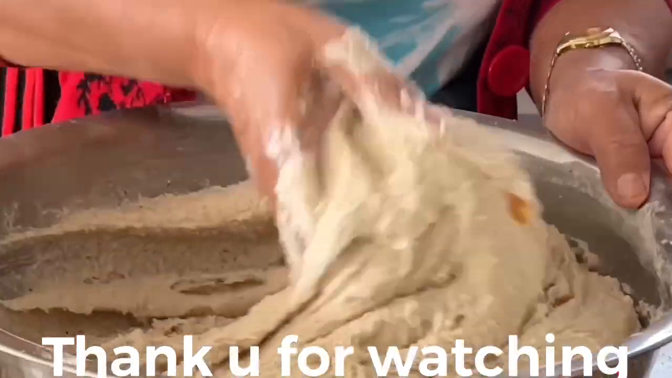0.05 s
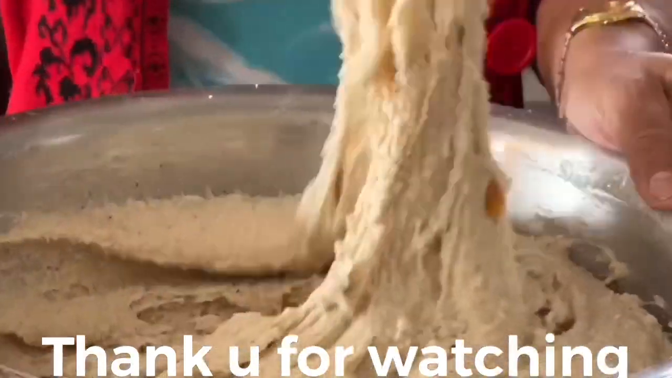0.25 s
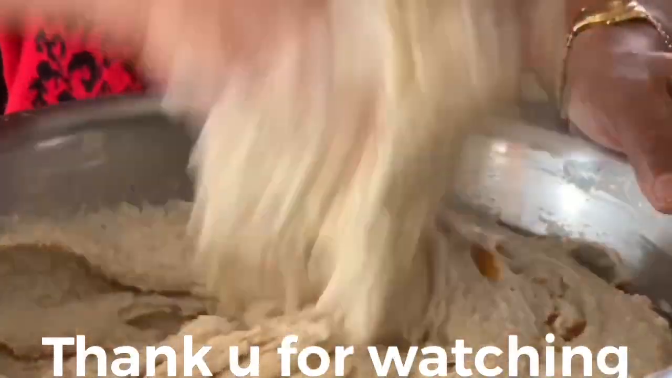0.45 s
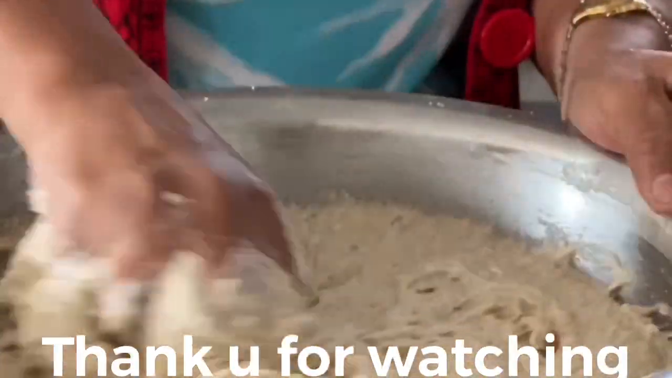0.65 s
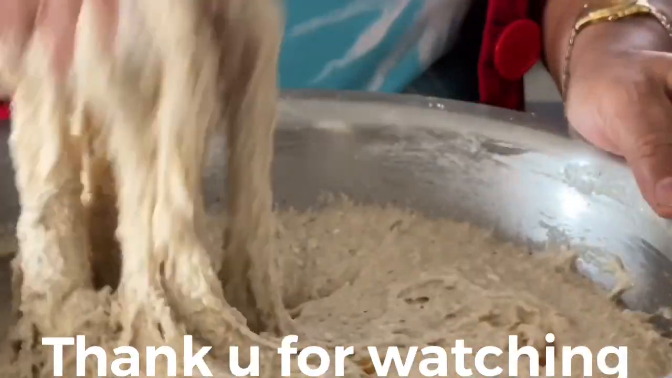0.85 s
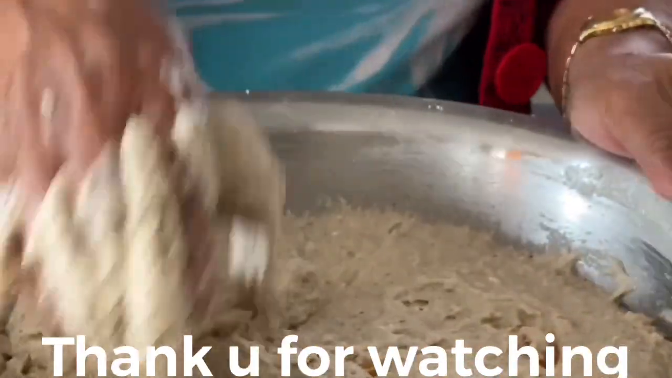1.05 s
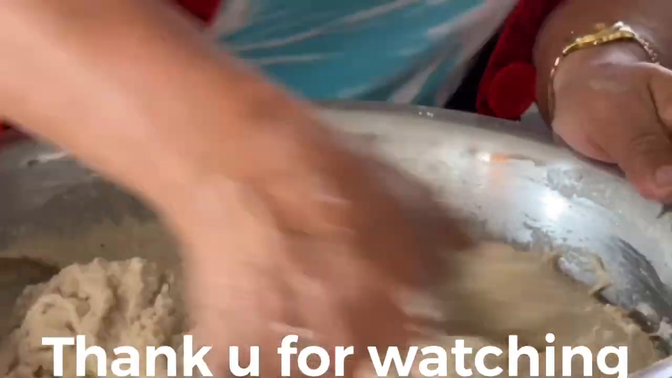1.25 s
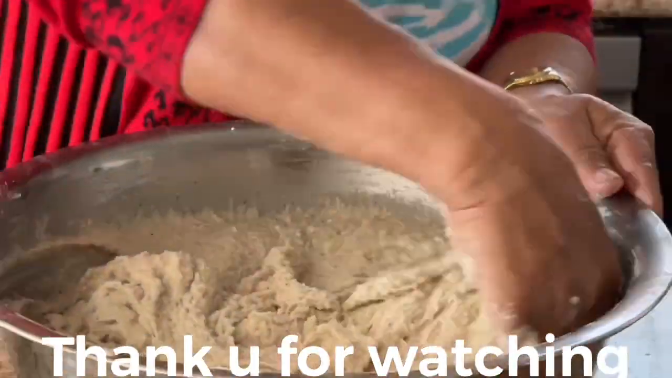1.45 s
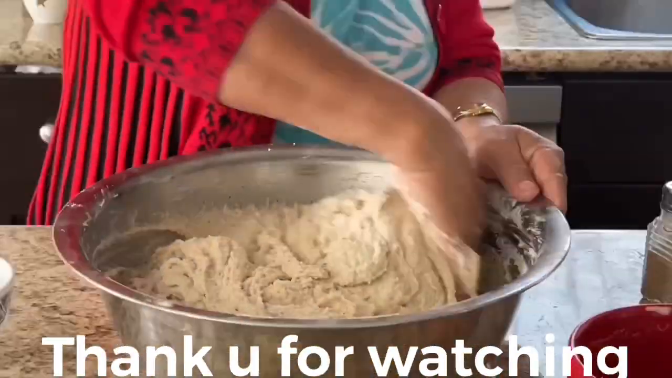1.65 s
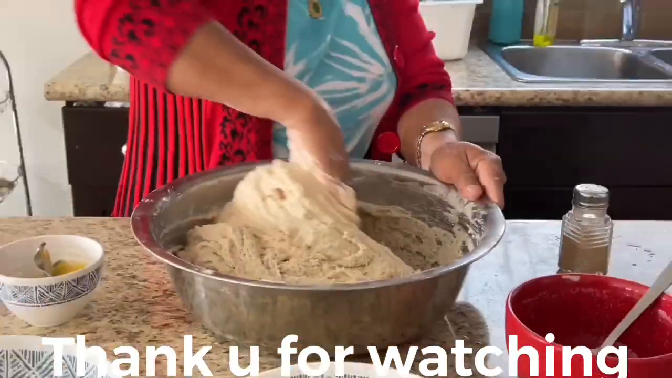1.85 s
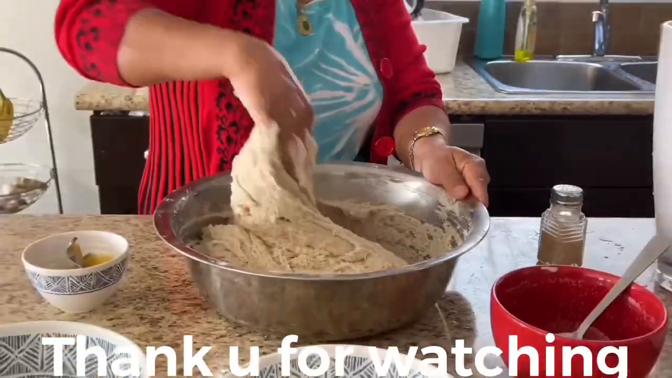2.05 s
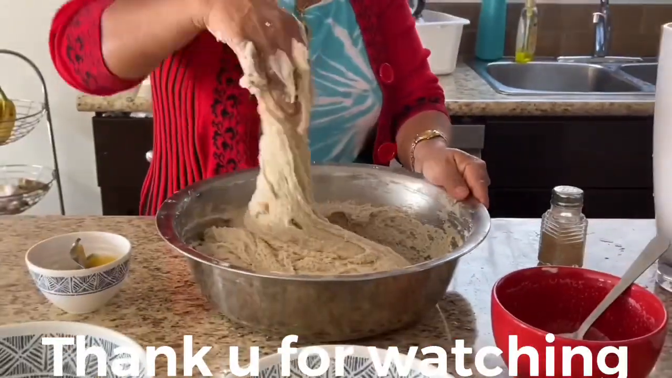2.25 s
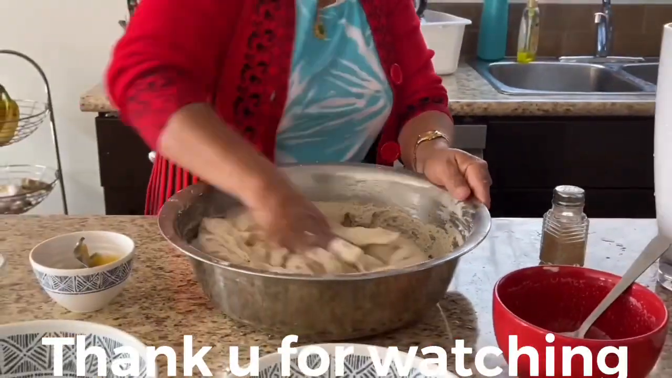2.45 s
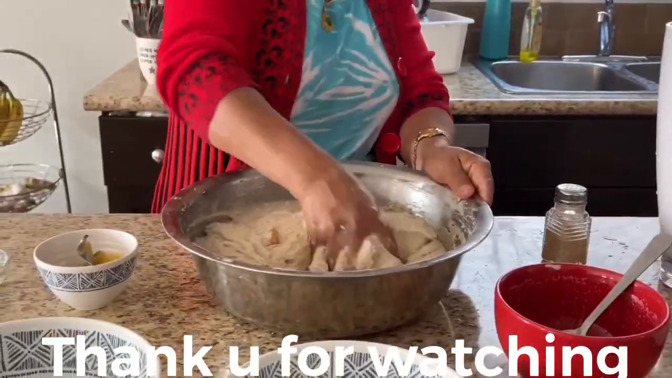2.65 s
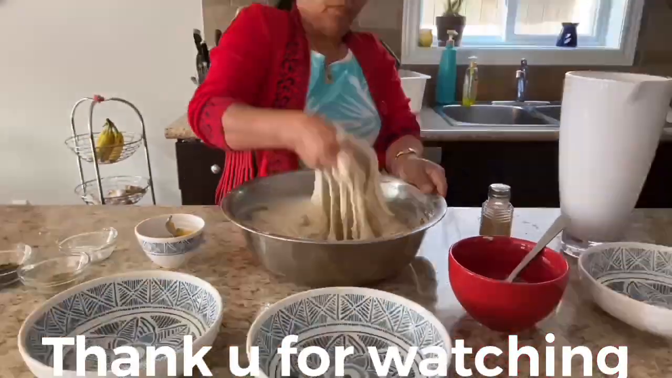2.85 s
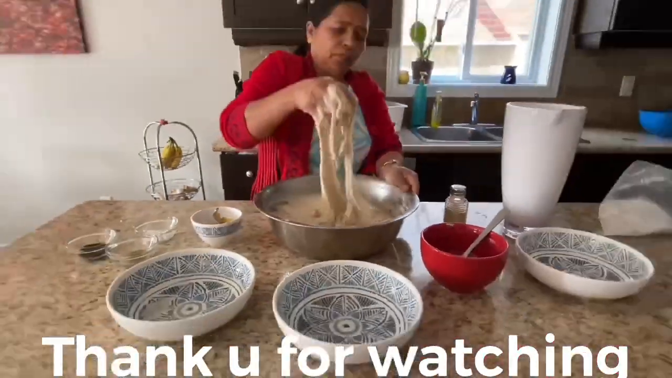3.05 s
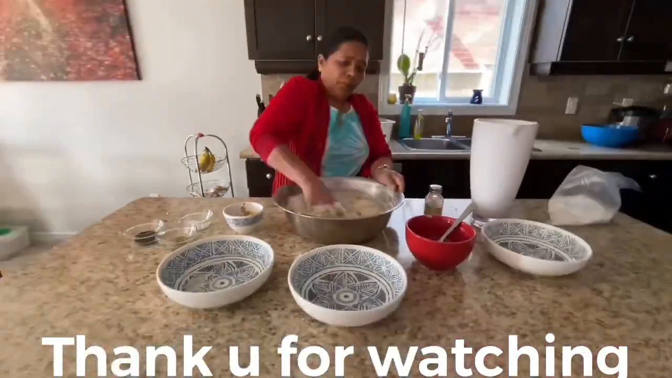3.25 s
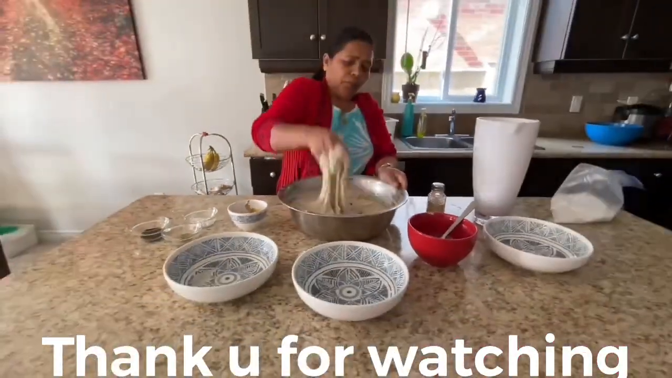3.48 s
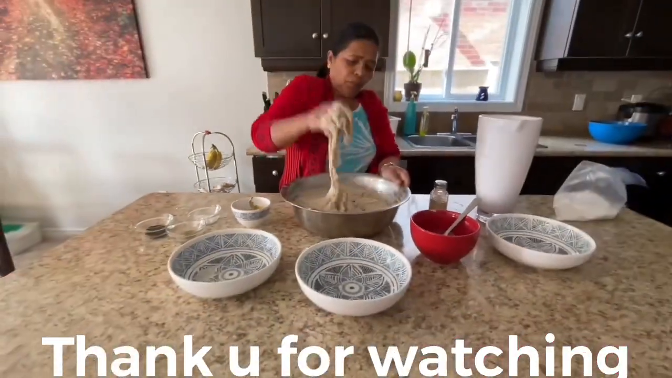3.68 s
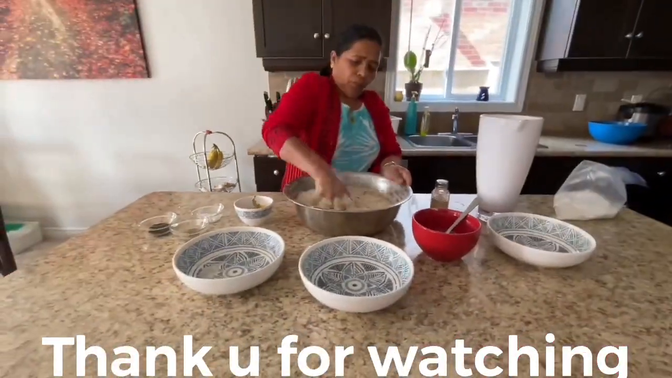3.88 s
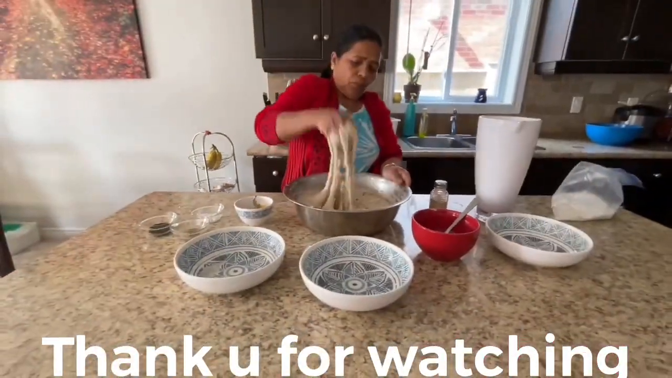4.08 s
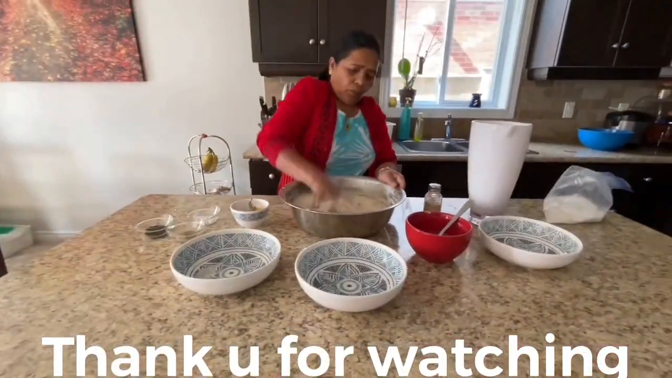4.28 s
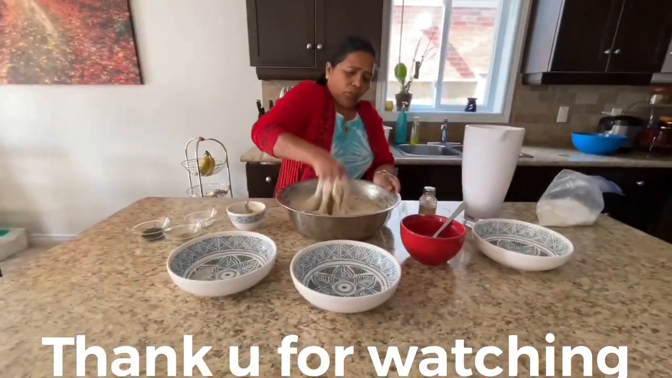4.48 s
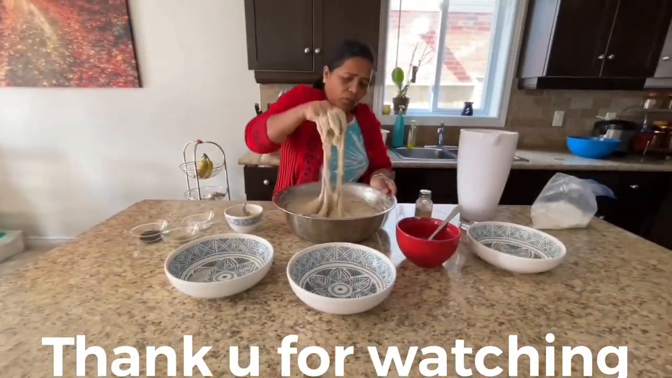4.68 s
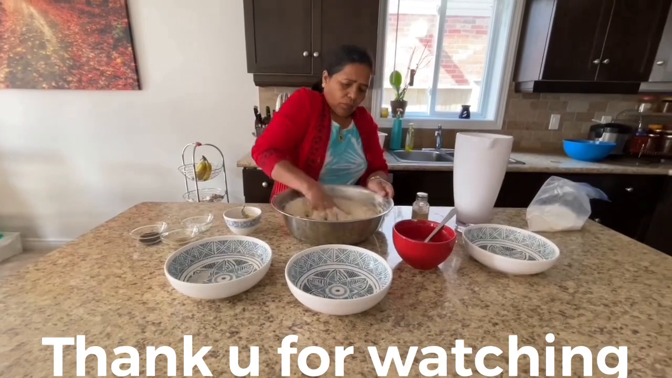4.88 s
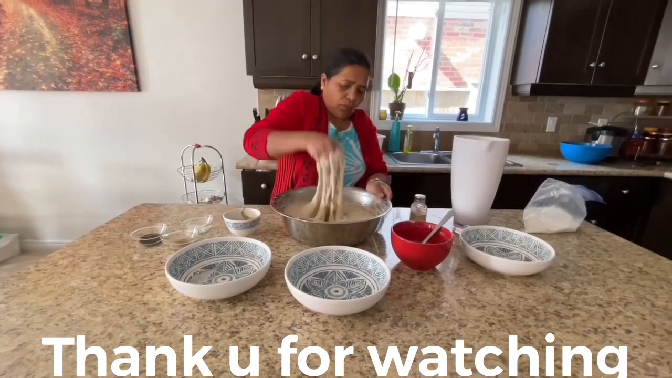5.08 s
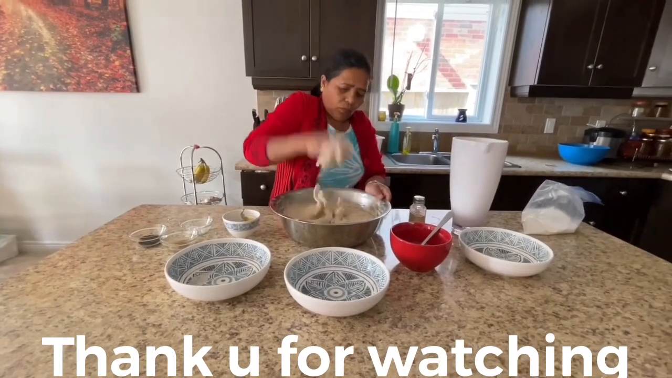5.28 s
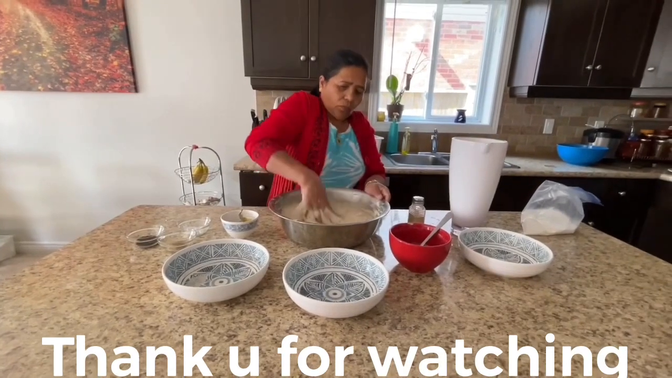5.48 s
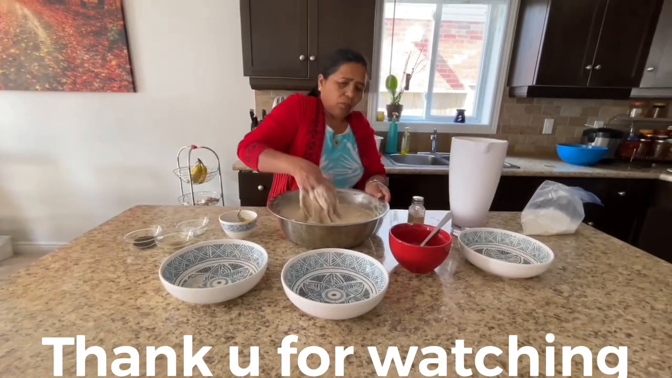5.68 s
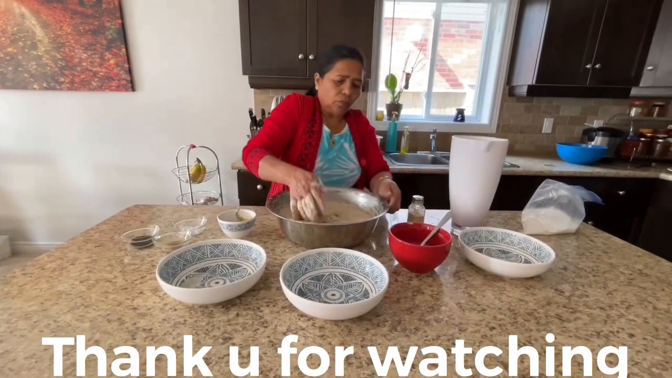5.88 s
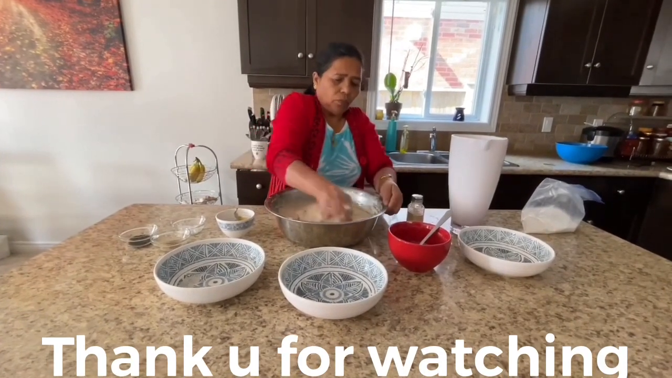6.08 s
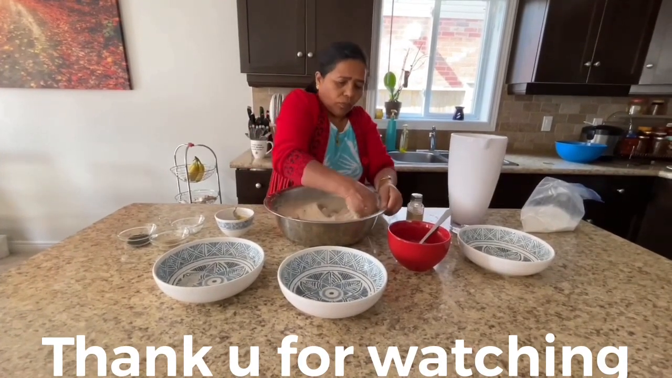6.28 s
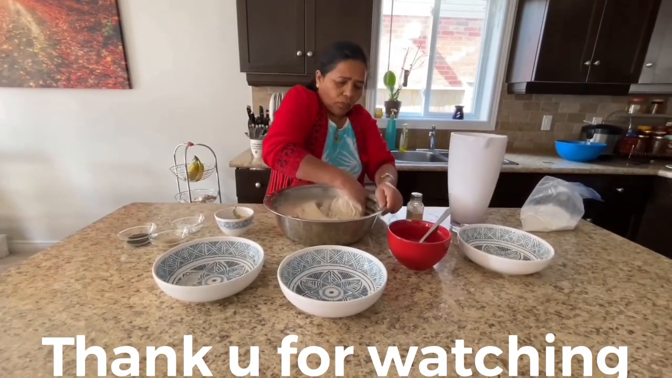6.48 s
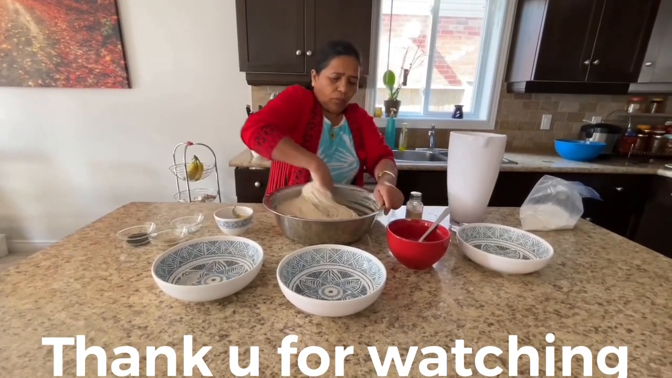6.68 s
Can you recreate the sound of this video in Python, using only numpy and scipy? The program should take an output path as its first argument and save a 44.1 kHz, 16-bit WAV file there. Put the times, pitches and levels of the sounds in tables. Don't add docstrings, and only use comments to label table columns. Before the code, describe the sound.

In a home kitchen, wet dough is worked by hand in a steel bowl. A faint drop and quiet stretching, sticky ticks and skin rubbing steel come first; then a light throw, and five heavy slaps about half a second apart, each with wet cracks, popping air and a deep thump. Rubbing closes it. A phone microphone starts close and shifts farther off midway, its noise suppression opening and closing the hiss over appliance rumble.

```python
import sys
import numpy as np
from scipy import signal
from scipy.fft import rfft, irfft
from scipy.io import wavfile
from scipy.ndimage import uniform_filter1d

SR = 44100
rng = np.random.default_rng(int(sys.argv[2]) if len(sys.argv) > 2 else 0)


def wav_out(sig):
    wavfile.write(sys.argv[1], SR, np.round(np.clip(np.atleast_2d(sig).T, -1, 1) * 32767).astype(np.int16))


def attenuation_scalar(level_db):
    decades = np.asarray(level_db, float) / 20
    return 10 ** decades


N = 296793
STEP_BACK_S = 3


def evened(x):
    return x / np.sqrt(np.mean(x ** 2) + 1e-20)


def read(points, hz):
    f, value = np.transpose(points)
    return np.interp(np.log(hz + 1), np.log(f + 1), value)


def add(mix, s, sound):
    part = mix[round(s * SR):][:len(sound)]
    part += sound[:len(part)]


def colour(x, gain_db):
    hz = np.fft.rfftfreq(x.shape[-1], 1 / SR)
    return irfft(rfft(x) * attenuation_scalar(gain_db(hz)), x.shape[-1])


# [t/s, level/dB, length/s, brightest f/Hz]
WET_CONTACTS = [(0.4018, -50, 0.0021, 2500), (0.4078, -39, .003, 4460), (0.4104, -30, 0.0063, 12000),
                (2.319, -41.5, 0.0074, 3080), (2.3356, -32.5, 0.0045, 2300), (2.341, -33.5, 0.0058, 8600),
                (2.3423, -20, 0.0017, 4630), (3.125, -43, .007, 5000), (3.13, -22.5, 0.0072, 6250),
                (3.138, -14.5, 0.0035, 3160), (3.1402, -12, 0.0027, 8240), (3.143, -20, 0.0044, 12000),
                (3.149, -16, 0.0016, 7320), (3.707, -30.5, .008, 4140), (3.713, -22, 0.0029, 6660),
                (3.718, -13, 0.0034, 8910), (4.243, -50, 0.0083, 5000), (4.2592, -29, 0.0046, 6000),
                (4.2613, -9.5, 0.0037, 6140), (4.2661, -6.5, .003, 2376), (4.267, -11.5, 0.006, 3905),
                (4.791, -33.5, 0.014, 6000), (4.8006, -8.5, 0.0078, 3927), (4.8106, -7.5, 0.001, 5600),
                (5.299, -28, 0.0064, 4203), (5.306, -9.5, 0.0028, 3040), (5.308, -12.5, 0.0048, 11940),
                (5.3096, -11, 0.0054, 6130)]
# [t/s, level/dB, length/s, brightest f/Hz]
FINGER_PEELS = [
    (0.937, -67.5, 0.0156, 3900),
    (1.007, -65, 0.0018, 6250),
    (5.749, -60, 0.013, 4050),
]
# [f/Hz, level/dB per Hz]
SMACK_COLOUR = [(300, -26), (800, 4.5), (1500, -2.5), (2200, -4), (4000, -4), (6000, -8.5), (8500, -11),
                (10500, -12), (12000, -5), (13300, -15), (15000, -20)]


def cracks(bright_db):
    out, t = np.zeros(N), np.arange(1024) / SR
    for s, db, length, bright_hz in WET_CONTACTS + FINGER_PEELS:
        uneven = attenuation_scalar(3.5 * rng.standard_normal(1024))
        snaps = rng.standard_normal(1024) * uneven
        spot = lambda hz: np.exp(-(np.log2((hz + 1) / bright_hz) / .14) ** 2)
        snaps = colour(snaps, lambda hz: read(SMACK_COLOUR, hz) + bright_db * spot(hz))
        swell = 1 - np.exp(-(t / (0.67 * length)) ** 2)
        die = np.exp(-(t / length) ** 2)
        add(out, s - .2 * length, attenuation_scalar(db + 3.5) * evened(snaps) * swell * die)
    return out


# [t/s of the middle, peak level/dB, f/Hz, length/cycles]
AIR_POCKETS = [(.4120, -38, 1570, 8.5), (0.4135, -23, 910, 0.5), (.4145, -22.5, 507, 1.4),
               (.4185, -38.5, 890, 5.6), (2.3220, -32, 605, 0.73), (2.338, -26, 714, 1.3),
               (2.3480, -23.5, 710, 1.8), (2.348, -29, 332, 3.7), (3.1405, -15.5, 860, 1.3),
               (3.1450, -4, 730, 0.84), (3.1470, -15.5, 1400, 2.7), (3.1485, -16.5, 383, 4.1),
               (3.7200, -9.5, 850, 0.88), (3.7230, -4.5, 400, 1.05), (3.7255, -11, 825, 2.9),
               (4.2670, -18, 1500, 2.5), (4.2665, -14, 2148, 5), (4.2728, -1.5, 361, 1.1),
               (4.2735, -6, 883, 1.9), (4.2780, -16, 743, 2), (4.8085, -8, 648, 1.1),
               (4.8100, -17.5, 1070, 2.1), (4.8113, -5, 389, 1.1), (4.8135, -9.5, 770, 1.5),
               (4.8165, -16, 977, 1.6), (5.3089, -14.5, 1707, 2.5), (5.3148, -10, 412, 2.6),
               (5.3172, -2.5, 432, 0.67), (5.3210, -9, 797, 2.5)]
# [t/s of the middle, peak level/dB, f/Hz, length/cycles]
DOUGH_BUBBLES = [
    (.5655, -45.5, 850, 0.75),
    (1.1560, -57, 2020, 2.5),
    (1.1850, -56, 4800, 5.5),
]


def pops():
    out, t = np.zeros(N), np.arange(-441, 442) / SR
    for s, db, hz, cycles in AIR_POCKETS + DOUGH_BUBBLES:
        soft_edges = np.exp(-(2 * t * hz / cycles) ** 2)
        add(out, s + t[0], -attenuation_scalar(db) * np.cos(2 * np.pi * hz * t) * soft_edges)
    return out


def ring(modes, t):
    total = 0
    for hz, db, t60, way, lean_db in modes:
        swing = np.sign(way) * attenuation_scalar(db - 60 * t / t60) * np.sin(2 * np.pi * hz * t)
        total = total + swing * attenuation_scalar([[lean_db / 2], [-lean_db / 2]])
    return total


# [t/s, level/dB, extra level of the upper modes/dB]
THROWS = [
    (0.4251, -32, -4),
    (2.3545, -19.5, -8.5),
    (3.154, -14, -1),
    (3.73, -11.5, -1.5),
    (4.2784, -13, -2),
    (4.8168, -15.5, 2.5),
    (5.3227, -12.5, 3),
]
# [f/Hz, level/dB, t60/s, first swing/sign, left-right level/dB]
LOW_WAVES = [(51.6, -17, 0.3, 1, -6), (61, -9.5, 0.66, -1, 2), (79.8, -2, 0.34, 1, -0.6),
             (79, -15.5, 0.05, 1, 0), (94.9, -13, 0.38, -1, -9.5)]
# [f/Hz, level/dB, t60/s, first swing/sign, left-right level/dB]
UPPER_WAVES = [(121.6, -9, 0.31, -1, 2), (161.6, -11.5, 0.17, 1, 5.5), (199, -5.5, 0.15, 1, 1.5),
               (254.5, -14, 0.36, -1, -4.5)]


def thumps():
    low, upper, t = np.zeros(N), np.zeros(N), np.arange(SR) / SR
    for s, db, upper_db in THROWS:
        add(low, s, attenuation_scalar([db]))
        add(upper, s - .004, attenuation_scalar([db + upper_db]))
    heard = lambda blows, modes: signal.fftconvolve(blows[None], ring(modes, t), axes=1)[:, :N]
    return uniform_filter1d(heard(low, LOW_WAVES) + heard(upper, UPPER_WAVES), size=100)


# [t/s, peak level/dB, f/Hz]
STRAND_TEARS = [
    (1.43, -54, 1780),
    (1.499, -48, 1000),
    (2.048, -48, 2830),
    (2.686, -53, 2690),
]


def ticks():
    out, t = np.zeros(N), np.arange(600) / SR
    for s, db, hz in STRAND_TEARS:
        rising = np.sin(2 * np.pi * hz * t * (1 + 12 * t))
        add(out, s, attenuation_scalar(db - 60 * t / .013) * rising * (1 - np.exp(-t / .0007)))
    return out


# [f/Hz, lead/rad]
PORT_LEAD = [(0, 0.5), (1460, 0.8), (3790, 2.3), (4650, 1.6), (5430, 3.5), (5940, 5.5), (6720, 9),
             (7240, 5.5), (8530, 10.5), (9470, 5), (10400, 4), (11300, -3), (12100, -1.76), (13200, -2)]


def ports(x):
    hz = np.fft.rfftfreq(N, 1 / SR)
    f, lead = np.transpose(PORT_LEAD)
    tilt_db = read([(400, -4.5), (1200, -2.5), (2500, 2.5), (8000, 2.4)], hz)
    right = irfft(rfft(x) * attenuation_scalar(tilt_db) * np.exp(-1j * np.interp(hz, f, lead)), N)
    return np.array([x, np.where(np.arange(N) > STEP_BACK_S * SR, right, x)])


# [f/Hz, correlation]
LIKENESS = [(60, .9), (180, 0.93), (520, .3), (1500, 0.086), (4300, 0.59), (5500, -0.045), (6300, -0.049),
            (8000, -0.052), (10500, -0.42), (11500, -0.59)]


def other_port(left, fresh, hz, limit):
    same = np.clip(read(LIKENESS, hz), -limit, limit)
    return same * left + np.sqrt(1 - same ** 2) * fresh


# [f/Hz, t60/s]
KITCHEN_DECAY = [(150, 0.11), (400, 0.4), (1040, 0.37), (2760, 0.37), (7280, 0.31)]
# [f/Hz, level/dB]
ECHO_TONE = [(100, -29.5), (200, 2), (380, -4), (560, -7), (850, -2), (1500, -1.5), (4000, -6), (8000, 3),
             (13000, -3.5)]


def tail():
    taps = np.zeros((2, SR // 2))
    at = np.arange(120, SR // 2 - 20, 10) + rng.integers(0, 10, (2, (SR // 2 - 131) // 10))
    np.put_along_axis(taps, at, rng.choice([-1., 1.], at.shape), 1)
    hz, t, z = signal.stft(taps, SR, nperseg=256)
    hz = hz[:, None]
    z[1] = other_port(z[0], z[1], hz, limit=.95)
    z = z * attenuation_scalar(read(ECHO_TONE, hz) - 60 * t / read(KITCHEN_DECAY, hz))
    lumps = uniform_filter1d(uniform_filter1d(rng.standard_normal(z.shape[1:]), size=4, axis=0), size=5)
    z = z * attenuation_scalar(2.5 * evened(lumps))
    echo = signal.istft(z, SR, nperseg=256)[1]
    return echo / np.linalg.norm(echo, axis=1)[:, None]


def echoes(x):
    return signal.fftconvolve(x[None], tail(), axes=1)[:, :N]


def scattered(x, turns):
    turn = 2 * np.pi * turns * np.arange(N) / SR
    return sum(echoes(x * np.sqrt(2 / 3) * np.cos(turn + k * np.pi / 3)) for k in range(3))


def noise_field(shape_db, patchy_db):
    frames, hz = N // 256 + 5, np.fft.rfftfreq(1024, 1 / SR)[:, None]
    a, b, c, d, patches = rng.standard_normal((frames, 513, 5)).T
    patches = evened(uniform_filter1d(uniform_filter1d(patches, 8, 0), 18, 1))
    left = a + 1j * b
    z = np.array([left, other_port(left, c + 1j * d, hz, limit=1)])
    unit = np.sqrt(np.mean(signal.istft(z[0], nperseg=1024, noverlap=768)[1] ** 2) / (SR / 2))
    z = z * attenuation_scalar(shape_db(hz, np.arange(frames) * 256 / SR) + patchy_db * patches) / unit
    return signal.istft(z, nperseg=1024, noverlap=768)[1][:, :N]


STROKE_RISE_S, RELEASE_DB_PER_S, PIVOT_HZ = 0.023, -260, 4000
FIRST_SHUT_HZ, LINGER_S = 6500, 0.015


def opening(hz, t, start, length, db, fade_db, tilt_db):
    u = t - start
    late = np.maximum(u - length - LINGER_S * np.log2((hz + 1) / FIRST_SHUT_HZ) ** 2, 0)
    level_db = db + fade_db * np.clip(u / length, 0, 1) + RELEASE_DB_PER_S * late
    level_db = level_db + tilt_db * np.log2((hz + 1) / PIVOT_HZ)
    return ((1 + np.tanh(u / STROKE_RISE_S)) / 2 * attenuation_scalar(level_db)) ** 2


# [t/s, length/s, level/dB per Hz, fade/dB a stroke, brightness/dB per octave]
HAND_STROKES = [(-0.05, 0.21, -108, -0.5, 1), (0.548, .22, -107, -2, 2), (0.935, 0.056, -114, -8, 5),
                (1.158, 0.28, -99, -5, -3), (1.406, 0.38, -102, -2.5, -2), (1.464, 0.642, -102, -10, 2),
                (2.59, 0.28, -109, 1, 2), (3.354, 0.11, -105, -15, 6.5), (3.897, 0.075, -108, 1, 5),
                (5.618, 0.083, -112, -4, 5.5), (5.73, 0.019, -106, -8, -1.5), (5.805, 0.042, -102, -7, -3),
                (5.797, 0.45, -110, 0, -1.5), (5.97, 0.058, -101, -12, -4.5),
                (6.083, 0.36, -100, -4.5, -1.5), (6.307, 0.94, -104, 0, -0.5), (6.625, 0.29, -106, 1, 5)]


def stretching(hz, t):
    return sum(opening(hz, t, *row) for row in HAND_STROKES)


# [t/s, length/s, level/dB per Hz, centre f/Hz, width/octaves]
WALL_RUBS = [(.7, 0.034, -104, 2200, .2), (.935, 0.019, -101, 4000, .2), (1.158, .08, -94.5, 5000, .3),
             (1.202, 0.26, -101, 2460, .4), (1.462, .08, -92.5, 1050, 0.23),
             (1.597, 0.27, -101, 3200, 0.46), (2.613, 0.13, -102, 2500, 0.64),
             (5.797, 0.33, -100, 4250, 0.11), (5.82, 0.43, -101, 6000, 0.06), (5.95, 0.1, -92, 1100, 0.33),
             (6.148, 0.12, -99, 3560, 0.46)]


def scraping(hz, t):
    power = 0
    for s, length, db, centre_hz, octaves in WALL_RUBS:
        band = np.exp(-(np.log2((hz + 1) / centre_hz) / octaves) ** 2)
        power = power + band * opening(hz, t, s, length, db, fade_db=-4, tilt_db=0)
    return power


HOLD_S = [
    0.24,
    .3,
    .33,
    .27,
    .29,
    0.29,
    0.19,
]
AHEAD_S = 0.062


def around_throws(hz, t):
    power = 0
    for (s, db, _), hold in zip(THROWS, HOLD_S):
        power = power + opening(hz, t, s - AHEAD_S, AHEAD_S, db=-106, fade_db=0, tilt_db=1.6)
        power = power + opening(hz, t, s, hold, db=-93 + 0.18 * db, fade_db=-12, tilt_db=-1.8)
    return power


# [f/Hz, level/dB per Hz]
SHUT_LEAK = [(800, -113), (2500, -119), (4000, -136), (13000, -138)]
# [f/Hz, level/dB]
RUSTLE_TONE = [(300, -25), (800, 2.5), (1300, 1), (3300, -2), (3700, -1.5), (10300, -3), (11900, 5.5),
               (12800, -4), (13300, -42.5)]
# [f/Hz, level/dB]
CLOSE_FIZZ = [(7000, -1.5), (9500, 1.5), (11800, 5.5)]
# [f/Hz, level/dB]
FAR_TONE = [(3600, -1.5), (4300, 2.2), (5000, -1.5), (5500, -5), (6000, 3.5), (6600, -.5)]


def rustle():
    def shape_db(hz, t):
        leak = attenuation_scalar(read(SHUT_LEAK, hz)) ** 2
        passed = leak + scraping(hz, t) + stretching(hz, t) + around_throws(hz, t)
        place = np.where(t > STEP_BACK_S, read(FAR_TONE, hz), read(CLOSE_FIZZ, hz))
        return 10 * np.log10(passed) + read(RUSTLE_TONE, hz) + place
    return noise_field(shape_db, patchy_db=2.0)


# [f/Hz, level/dB per Hz]
APPLIANCES = [(20, -38), (40, -19), (50, -4), (62, 2), (85, -3), (128, -4.5), (170, -9), (300, -16),
              (520, -19), (800, -25.5), (1300, -37), (2500, -42.5), (5000, -53), (13000, -41)]


def rumble():
    return attenuation_scalar(-57) * evened(noise_field(lambda hz, t: read(APPLIANCES, hz) + 0 * t, patchy_db=1.2))


def scene():
    air = pops()
    straight = ports(cracks(bright_db=7.5) + air + ticks())
    snap_echo = scattered(cracks(bright_db=1.5), turns=400)
    pop_echo = scattered(air, turns=21)
    return straight + attenuation_scalar(-4.0) * snap_echo + attenuation_scalar(-2.5) * pop_echo + thumps() + rumble() + rustle()


def thinned_treble(mid):
    hz, t, z = signal.stft(mid, SR, nperseg=512)
    low, high, top, hole = (evened(uniform_filter1d(v, size=9)) for v in rng.standard_normal((len(t), 4)).T)
    level_db = 10 * np.log10((abs(z[100:]) ** 2).sum(0) + 1e-20)
    hz = hz[:, None]
    dropped = (hz > 10520 + 170 * low) & (hz < 11000 + 200 * high)
    dropped |= hz > 12800 + 220 * top
    dropped |= (abs(hz - 5550) < 130 * (hole - .4)) & (t > STEP_BACK_S)
    calm = level_db < np.roll(level_db, 3) + 10
    return mid - signal.istft(z * dropped * calm, SR, nperseg=512)[1][:N]


def low_pass(x):
    return signal.sosfilt(signal.butter(12, 13580, fs=SR, output="sos"), x)


def record(dry):
    mid, side = dry.mean(0), (dry[0] - dry[1]) / 2
    mid = colour(mid, lambda hz: read([(15, -26.5), (45, 2.5)], hz))
    mid = colour(mid, lambda hz: read([(13000, -0.5), (14000, -16.0), (17000, -35.0)], hz))
    mid = thinned_treble(mid)
    side = colour(side, lambda hz: read([(10800, 0.5), (11600, 1), (12300, -8), (13000, -36.5)], hz))
    limited = 1.4 * np.tanh(np.array([mid + side, mid - side]) / 1.4)
    return low_pass(limited)


dry = scene()
out = record(dry)
wav_out(out)
```